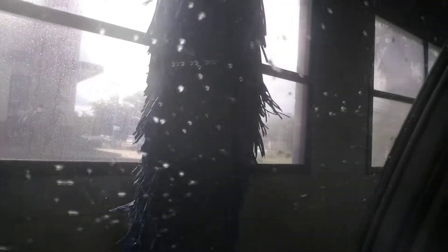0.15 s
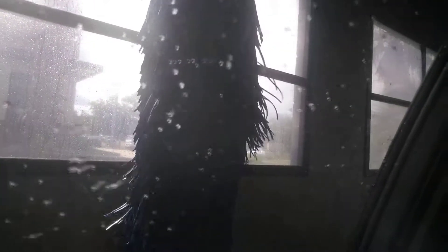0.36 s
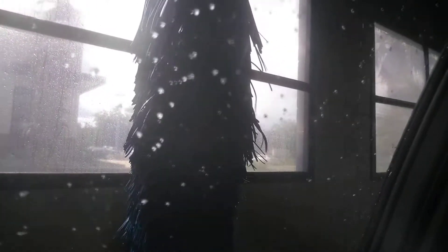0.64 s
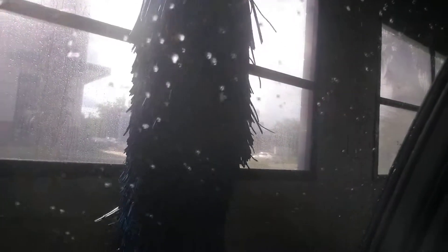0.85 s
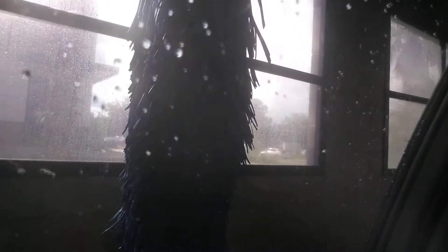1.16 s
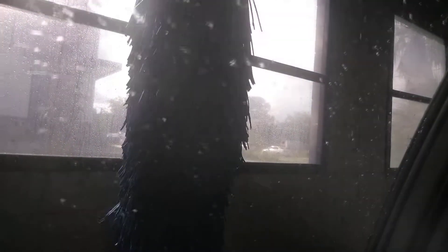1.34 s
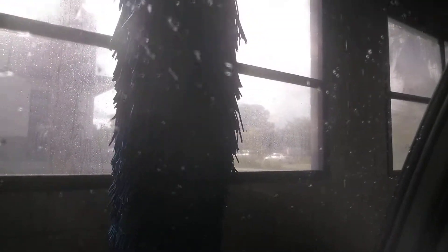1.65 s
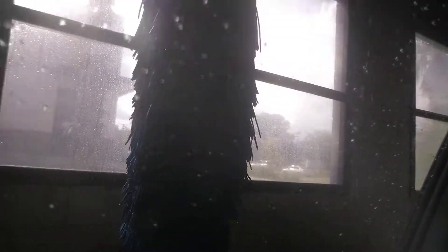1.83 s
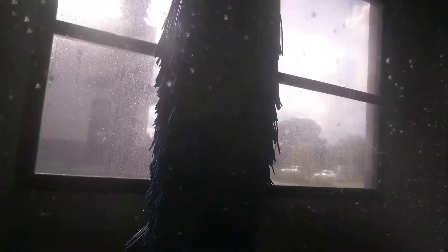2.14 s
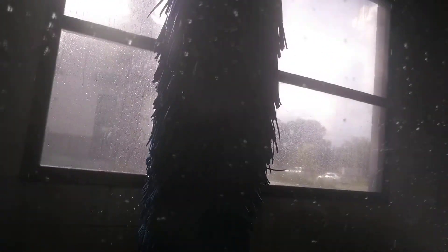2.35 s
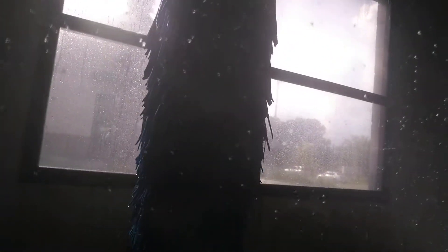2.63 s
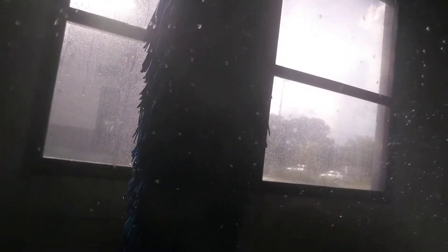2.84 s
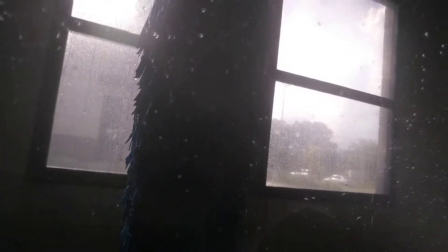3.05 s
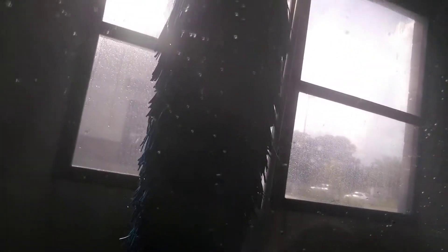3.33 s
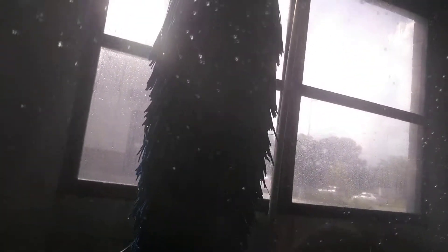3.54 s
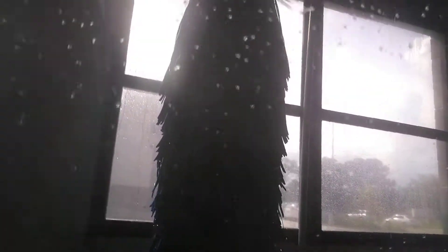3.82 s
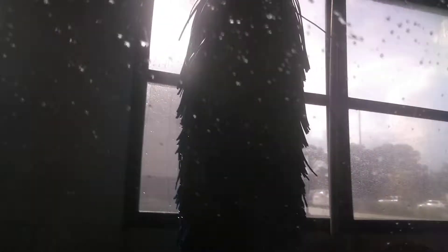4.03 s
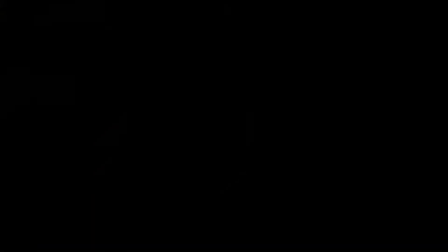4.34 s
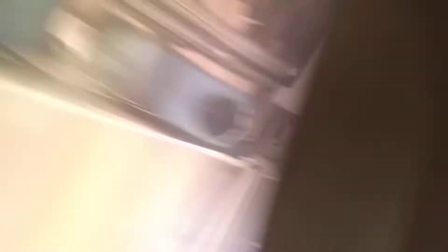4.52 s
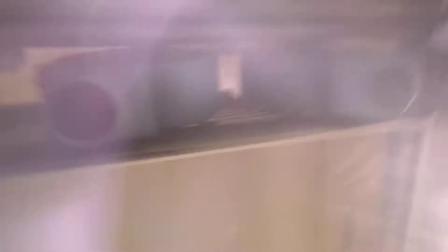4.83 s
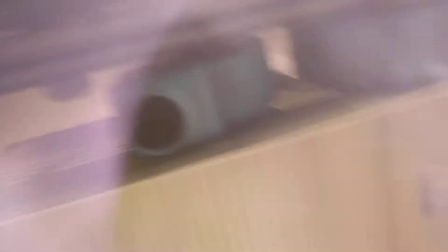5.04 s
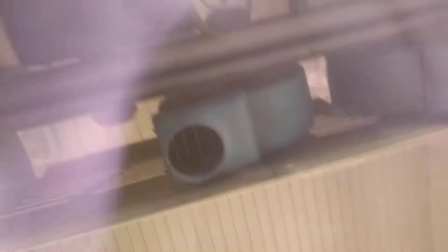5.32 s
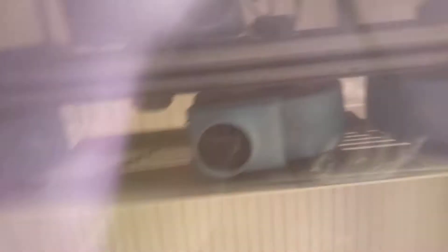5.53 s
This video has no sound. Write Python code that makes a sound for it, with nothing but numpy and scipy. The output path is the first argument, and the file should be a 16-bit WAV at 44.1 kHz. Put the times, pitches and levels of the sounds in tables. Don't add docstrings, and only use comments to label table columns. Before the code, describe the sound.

A deep, broad blower roar is already running inside a closed car in a wash bay, and never stops. A sweep of rushing air brightens it around 0.3 s, while a soft fan hum near the pitch of a low-middle note swells until about 1 s. Irregular lumps of air thump the bodywork, several between 0.9 and 1.8 s and a heavy one near 2.8 s. Tiny sharp drop ticks land on the glass at about 1.7 and 1.8 s, as another sweep passes near 1.9 s. The hum returns around 3.2 s, with a brief rush near 3.5 s and a low boom about 4 s. From 4.3 to 4.7 s the handheld phone turns toward the nozzles and glass: strong thumps, brighter rush, fluttering whistles and panel drone emerge. Quick puffs strike at 5.0 to 5.4 s, with thin hiss and a faint handling rumble until it cuts off near 5.7 s.

```python
import sys
import numpy as np
from scipy import signal
from scipy.fft import rfft, irfft, next_fast_len
from scipy.io import wavfile
from scipy.ndimage import uniform_filter1d

SR = 44100
rng = np.random.default_rng(int(sys.argv[2]) if len(sys.argv) > 2 else 0)


def voltage_ratio(level):
    return 10 ** (np.asarray(level, float) / 20)


def int16_out(signal):
    q = np.round(np.clip(np.atleast_2d(signal).T, -1, 1) * 32767)
    wavfile.write(sys.argv[1], SR, q.astype(np.int16))


N = 250047


def in_time(rows):
    s, *columns = np.transpose(rows)
    return [np.interp(np.arange(N) / SR, s, c) for c in columns]


def at_hz(rows, hz):
    f, *columns = np.transpose(rows)
    return [np.interp(np.log(hz), np.log(f), c) for c in columns]


def rms_one(x):
    return x / np.sqrt(np.mean(x ** 2) + 1e-20)


def bump(s, length):
    return np.exp(-((np.arange(N) / SR - s) / (length / 2)) ** 2)


def band(x, low_hz, high_hz):
    return signal.sosfilt(signal.butter(2, [low_hz, high_hz], "band", fs=SR, output="sos"), x)


def drift(rate_hz):
    r = np.exp(-80 * np.pi * rate_hz / SR)
    noise = rng.standard_normal(N // 40 + 2002)
    slow = signal.lfilter([1], [1, -2 * r, r * r], noise)[2000:]
    return np.interp(np.arange(N) / 40, np.arange(len(slow)), rms_one(slow))


def noise_line(hz_phase, width_hz):
    return drift(width_hz) * np.cos(hz_phase) + drift(width_hz) * np.sin(hz_phase)


def resonate(x, modes):
    for hz, width, db in modes:
        r, w = np.exp(-np.pi * width / SR), 2 * np.pi * hz / SR
        ring = signal.lfilter([(1 - r * r) / 2, 0, (r * r - 1) / 2], [1, -2 * r * np.cos(w), r * r], x)
        x = x + (voltage_ratio(db) - 1) * ring
    return x


def level(law, lift_db, near):
    rest_db, share, roll_db, glass_db, late = law
    return voltage_ratio(rest_db + share * lift_db + roll_db * np.arange(N) / SR + glass_db * near ** late)


# Hz, likeness 0-1, near minus far level in dB, lead of the near port in rad.
PORTS_AT_REST = [(40, 0.93, -1.7, -0.02), (80, 0.97, -1.7, 0.02), (130, 0.97, -1.3, 0.08),
                 (200, 0.96, -1.0, 0.14), (280, 0.92, -1.7, 0.15), (380, 0.86, 0.2, 0.32),
                 (520, 0.53, -0.1, 0.85), (700, 0.31, 0.9, 0.87), (950, 0.43, 1.1, 1.49),
                 (1300, 0.42, 1.6, -2.82), (1800, 0.27, -2.4, -3.12), (2500, 0.17, -1.7, -0.36),
                 (4000, 0.09, -1.2, 0.74), (12000, 0.04, 2.0, -0.13)]
PORTS_TURNED = [(40, 0.97, -0.9, -0.08), (80, 0.96, 0.7, -0.02), (130, 0.83, -4.9, 0.06),
                (200, 0.76, -2.7, 0.27), (280, 0.73, -1.7, 0.47), (380, 0.73, -0.8, 0.34),
                (520, 0.61, -1.9, 0.17), (700, 0.65, -1.9, 0.28), (950, 0.37, -1.6, 0.46),
                (1300, 0.04, -1.3, -1.1), (1800, 0.45, -3.0, -3.09), (2500, 0.05, -0.8, 0.49),
                (4000, 0.23, -1.0, 1.8), (12000, 0.09, 2.1, -0.32)]
# Hz, gain in dB.
FACING = [(60, 1), (150, -1.5), (230, 1.5), (330, -3), (550, -1.5), (800, -4), (1100, 3), (1400, -7),
          (1800, -2.5), (2500, -1.5), (3200, 5.5), (4500, -0.5), (7000, 4.5), (13000, 3)]


def turbulence(spectrum, turned, gust_db, patch_db):
    bottom, top = spectrum[0][0], spectrum[-1][0]
    edges = bottom * 2 ** np.arange(0, np.log2(top / bottom) + 1 / 3, 1 / 3)
    white = rng.standard_normal((2, 2, N + 4096))
    out, gust = 0, drift(4.3) + drift(25.0)
    for k, (low, high) in enumerate(zip(edges, edges[1:])):
        common, apart = band(white[k % 2], low, high)[:, 4096:]
        hz = np.sqrt(low * high)
        rest, facing = at_hz(PORTS_AT_REST, hz), at_hz(PORTS_TURNED, hz)
        alike, lean_db, lead = [a + turned * (b - a) for a, b in zip(rest, facing)]
        ahead = np.gradient(common) / np.sin(2 * np.pi * hz / SR)
        shared = np.array([np.cos(lead) * common + np.sin(lead) * ahead, common])
        pair = np.sqrt(alike) * shared + np.sqrt(1 - alike) * np.array([apart, apart[::-1]])
        level_db = at_hz(spectrum, hz)[0] + turned * at_hz(FACING, hz)[0]
        level_db = level_db + gust_db * gust + patch_db * drift(8.1)
        out = out + voltage_ratio(level_db + lean_db * [[.5], [-.5]]) * pair
    return rms_one(out)


def grip():
    swell = bump(5.8, .35) * band(rng.standard_normal(N), 14, 36)
    return voltage_ratio(-18) * swell / abs(swell).max()


# start in seconds, peak in dB.
DROPS = [
    (1.657, -39),
    (1.683, -26.5),
    (1.8083, -40),
    (1.8163, -36),
]


def drops():
    out, t = np.zeros((2, N)), np.arange(-100, 400) / SR
    tick = np.exp(-(t / .00002) ** 2) - 0.6 * np.exp(-((t - .00029) / .00002) ** 2)
    rattle_db = -21 - 60 * np.where(t < 0, -t / .007, t / .008)
    for s, db in DROPS:
        rattle = rng.standard_normal((2, 500)) * voltage_ratio(rattle_db)
        at = round((s + 0.00035) * SR) - 100
        out[:, at:at + 500] += voltage_ratio(db + 17.5) * (tick * voltage_ratio([[0], [-12]]) + rattle)
    return band(out + 1e-18, 7200, 13500)


# Hz, width in Hz, level in dB.
ROOF = [(411.4, 49, -36.5), (592.5, 32, -38.5), (678.6, 19, -39), (1140, 28, -50.5), (800, 55, -46),
        (978, 69, -49.5), (1398, 26, -59.5), (2250, 60, -50)]


def roof(turned):
    phase = 2 * np.pi * np.arange(N) / SR
    lines = sum(voltage_ratio(db) * noise_line(hz * phase, width) for hz, width, db in ROOF)
    return turned ** 1.03 * lines * voltage_ratio([[2.5], [-3.5]])


# time in seconds, pitch in Hz, level in dB.
HUM = [
    (0, 256, -34),
    (.65, 254.9, -26.5),
    (1.2, 244, -51),
    (3.2, 250, -31.5),
    (4.4, 241.6, -40.5),
    (5.67, 239.5, -43),
]


def hum():
    hz, db = in_time(HUM)
    line = noise_line(2 * np.pi * np.cumsum(hz) / SR, 9.6)
    return voltage_ratio(db) * line * voltage_ratio([[1.5], [-1.5]])


# start in seconds, peak in dB, length in seconds.
BUFFETS = [
    (3.611, -30, 0.035),
    (3.858, -32, 0.054),
    (4.4318, -41, 0.029),
    (4.8894, -40, 0.03),
    (5.04, -22.5, 0.042),
    (5.218, -20, 0.045),
    (5.295, -19.5, 0.021),
    (5.379, -17.5, 0.024),
]


def buffets():
    t, puff_level = np.arange(N) / SR, np.zeros(N)
    for s, db, length in BUFFETS:
        puff_level += voltage_ratio(db - 8.5) * np.exp(-((t - s - length / 2) / (0.45 * length)) ** 2)
    puff = rms_one(band(rng.standard_normal((2, N)), 1550, 2250))
    return puff_level * (puff - 0.11 * puff[::-1])


# Hz, density in dB per Hz.
HISS = [(3500, 3), (5000, 1.5), (6800, -4.5), (9000, -9.5), (11000, -4), (12200, -6), (13300, -16.5),
        (14500, -36)]
# dB at rest, share of the jet's lift, dB per s of travel, dB gained at the glass, lateness.
HISS_LAW = (-52, 0.03, -0.54, 12, 3.5)


def hiss(lift_db, near, turned):
    return level(HISS_LAW, lift_db, near) * turbulence(HISS, turned, gust_db=0.48, patch_db=0.8)


# Hz, width in Hz, level in dB, likeness at the ports -1 to 1.
WHISTLES = [(1517, 80, -18.5, 0.32), (1640, 160, -15, -0.54), (1740, 146, -13, 0.38), (1950, 400, -13, -.6),
            (2980, 46, -20, 0.16), (3303, 300, -18, 0.012)]


def whistles(turned):
    out = 0
    for hz, width, db, alike in WHISTLES:
        sos = signal.butter(2, width / 2, fs=SR, output="sos")
        phase = 2 * np.pi * np.cumsum(hz * (1 + .03 * drift(2.5))) / SR
        a, b = signal.sosfilt(sos, rng.standard_normal((2, 2, N)))
        line = rms_one(a * np.cos(phase) + b * np.sin(phase))
        out = out + voltage_ratio(db + 3.1 * drift(6.3)) * (line + alike * line[::-1])
    return out * (0.15 + 1.73 * turned ** 1.1)


# Hz, density in dB per Hz.
JET = [(800, -33), (1100, -8), (1400, -1), (1900, -4.5), (2350, -5.5), (3000, -11.5), (4000, -12),
       (5500, -21), (8000, -62)]
# Hz, width in Hz, lift in dB.
GLASS = [(1700, 265, 3), (1865, 254, 3.5), (2100, 120, 2.5), (3000, 130, -1), (3800, 270, -3)]
# dB at rest, share of the jet's lift, dB per s of travel, dB gained at the glass, lateness.
JET_LAW = (-45, 0.75, 0.2664, 10.5, 1.3)


def jet(lift_db, near, turned):
    rush = resonate(turbulence(JET, turned, gust_db=.5, patch_db=0.7), GLASS)
    return level(JET_LAW, lift_db, near) * (rush + whistles(turned))


# Hz, density in dB per Hz.
PANELS = [(300, -5.5), (430, 2.5), (540, -3), (700, 5), (850, -5), (1050, -19), (1400, -45)]
# dB at rest, share of the jet's lift, dB per s of travel, dB gained at the glass, lateness.
PANEL_LAW = (-34.5, 0.4861, -0.1342, 7, 0.75)


def panels(lift_db, near, turned):
    return level(PANEL_LAW, lift_db, near) * turbulence(PANELS, turned, gust_db=0.58, patch_db=-1.1)


# Hz, density in dB per Hz.
THUD = [(25, -34), (40, -4.5), (55, -4.5), (70, -7.5), (88, 2.2), (110, -4), (150, -10)]
# dB at rest, share of the jet's lift, dB per s of travel, dB gained at the glass, lateness.
THUD_LAW = (-23.5, 0.04, 0.37, -2.5, 0.7)


def thud(lift_db, near, turned):
    boom = voltage_ratio(3 * bump(3.94, 1))
    return boom * level(THUD_LAW, lift_db, near) * turbulence(THUD, turned, gust_db=-0.05, patch_db=-1.0)


# start in seconds, peak in dB, length in seconds.
SURGES = [(0.28, -20.5, 0.093), (0.79, -19, 0.13), (0.964, -13.5, 0.11), (1.21, -16, 0.088),
          (1.34, -14, 0.1), (1.636, -14, 0.063), (1.757, -12, 0.093), (1.963, -20, 0.081),
          (2.078, -24.5, 0.2), (2.363, -20.5, 0.1), (2.455, -17.5, 0.12), (2.604, -23.5, 0.13),
          (2.822, -9.5, 0.12), (2.933, -18, 0.16), (3.119, -21.5, 0.1), (3.718, -20.5, 0.11),
          (4.055, -22, 0.1), (4.168, -17, 0.12), (4.559, -18.5, 0.13), (4.678, -7.5, 0.087),
          (4.862, -9, 0.063), (4.984, -12, 0.1), (5.362, -21.5, 0.1), (5.456, -13, 0.12)]


def surges():
    return voltage_ratio(0.37 * sum((db + 19) * bump(s + length / 3, length) for s, db, length in SURGES))


# Hz, density in dB per Hz.
ROAR = [(90, -21), (125, -2.5), (200, -4), (300, -8.5), (450, -16.5), (700, -34)]
# dB at rest, share of the jet's lift, dB per s of travel, dB gained at the glass, lateness.
ROAR_LAW = (-19.5, 0.0166, -0.9244, 3.5, 0.8)


def roar(lift_db, near, turned):
    return level(ROAR_LAW, lift_db, near) * turbulence(ROAR, turned, gust_db=0.34, patch_db=0.52)


# Hz, width in Hz, lift in dB.
CABIN = [(74.4, 16, 1.5), (234, 5.1, 1.5), (246.4, 37, 4.5), (381, 82, 2), (496, 15, 4.5), (695, 110, -2.5)]


def cabin(low):
    return resonate(low, CABIN)


# time in seconds, lift in dB, length in seconds.
PASSES = [
    (0.307, 7, 1),
    (1.874, 5, 0.61),
    (2.347, 4.5, 0.33),
    (3.55, 5, 0.31),
    (4.0, 2.5, 1),
    (4.65, 0.5, 0.41),
    (5.323, 3.5, 0.3),
]
# time in seconds, nearness 0-1.
NEAR = [
    (0, 0.01),
    (4.33, 0.01),
    (4.5, 0.53),
    (4.7, 0.56),
    (5.05, 0.66),
    (5.3, 0.68),
    (5.55, 0.95),
    (5.67, 0.91),
]
# time in seconds, turn 0-1.
POSE = [
    (0, 0.0),
    (2.0, 0.09),
    (4.2, 0.11),
    (4.6, 0.86),
    (5.67, 0.87),
]


def scene():
    lift_db = sum(db * bump(s, length) for s, db, length in PASSES)
    near, turned = in_time(NEAR)[0], in_time(POSE)[0]
    surge = surges()
    low = thud(lift_db, near, turned)
    low += surge * roar(lift_db, near, turned)
    low += surge ** 0.51 * panels(lift_db, near, turned)
    mix = cabin(low) + jet(lift_db, near, turned) + hiss(lift_db, near, turned)
    return mix + buffets() + drops() + grip() + surge * hum() + roof(turned)


# Hz, share taken away 0-1, phase lead in rad.
CROSS = [(100, .87, 0), (1100, .83, .1), (2300, .81, .2), (3400, .62, .3), (4600, .47, .4), (6800, .4, .5),
         (8000, .28, .4), (10000, .32, .4), (12000, .38, .45), (13400, .36, .45), (14300, .6, .1)]


def widen(ports):
    lag_ms = .4535
    size = next_fast_len(N + 1024)
    hz = np.arange(1, size // 2 + 2) * SR / size
    share, lead = at_hz(CROSS, hz)
    cancel = share * np.exp(1j * lead - 2j * np.pi * hz * lag_ms / 1000)
    return ports - irfft(rfft(ports[::-1], size) * cancel, size)[:, :N]


# Hz, depth in dB.
MASK = [(700, 30), (1100, 27), (2300, 17), (3400, 14.5), (4600, 11), (6800, 8), (9000, 8.5), (11000, 8.5),
        (13400, 13)]
# Hz, contrast 0-1.
GRAIN = [(300, .05), (1000, .2), (4000, .22), (8000, .33), (13000, .55)]


def starve(x, uneven_db):
    turn = np.array([[1, 1.0], [1, -1.04]])
    hz, _, z = signal.stft(np.pad(turn @ x, ((0, 0), (600, 0))), SR, "cosine", 2048)
    each = abs(z) ** 2 + 1e-16
    contrast = at_hz(GRAIN, hz + 1)[0][:, None]
    rough = each * abs(each / uniform_filter1d(each, size=9, axis=1)) ** contrast
    restore = uniform_filter1d(each, size=33, axis=1) / uniform_filter1d(rough, size=33, axis=1)
    z *= np.sqrt(abs(rough / each * restore))
    edges = np.r_[0:200:8, 200:1025:10]
    widths = np.diff(np.r_[edges, 1025])
    power = np.add.reduceat(each, edges, axis=1) / widths[:, None]
    shortage = rng.standard_normal(power.shape)
    under_db = at_hz(MASK, hz[edges] + 90)[0][:, None] + uneven_db * rms_one(shortage)
    louder = uniform_filter1d(power.max(axis=0), size=11, axis=0)
    louder_db = 10 * np.log10(louder)
    sag_db = uniform_filter1d(louder_db, size=7, axis=1) - uniform_filter1d(louder_db, size=45, axis=1)
    mask = louder * voltage_ratio(-2 * (under_db + 1.5 * sag_db))
    z *= np.repeat(power > mask, widths, axis=1)
    return turn @ signal.istft(z, SR, "cosine", 2048)[1][:, 600:600 + N] / 2


def band_limit(x):
    return signal.sosfilt(signal.butter(12, 14300, fs=SR, output="sos"), x)


def record(dry):
    low_pass = signal.cheby2(16, 45, 14600, fs=SR, output="sos")
    wide = signal.sosfilt(low_pass, widen(dry))
    mix = starve(wide, uneven_db=3.5)
    return band_limit(mix)


dry = scene()
out = record(dry)
int16_out(out)
```